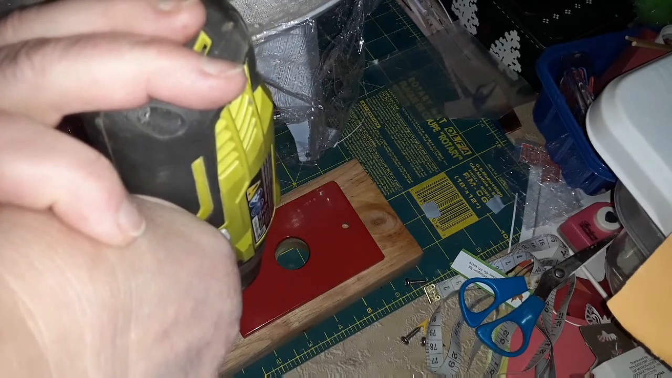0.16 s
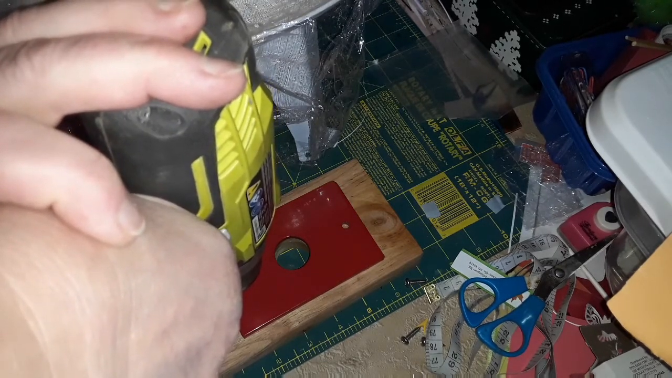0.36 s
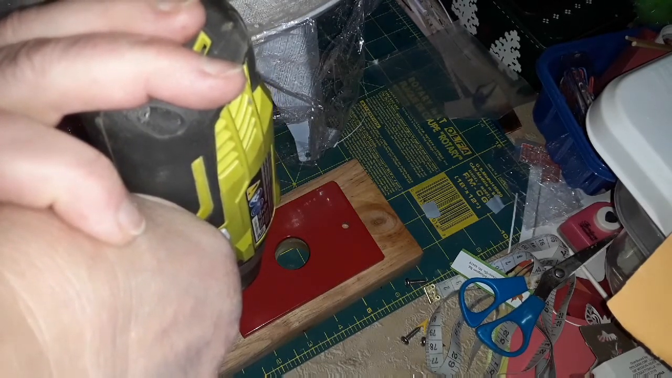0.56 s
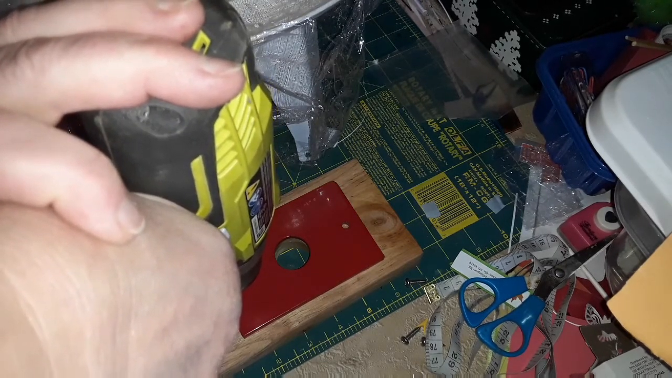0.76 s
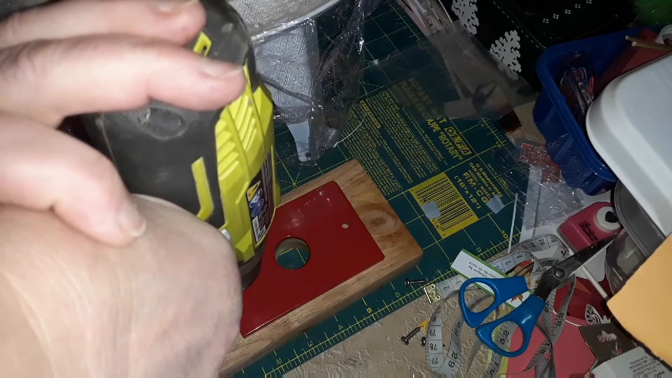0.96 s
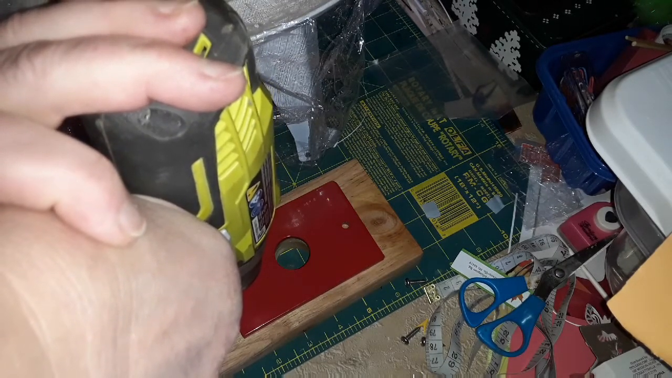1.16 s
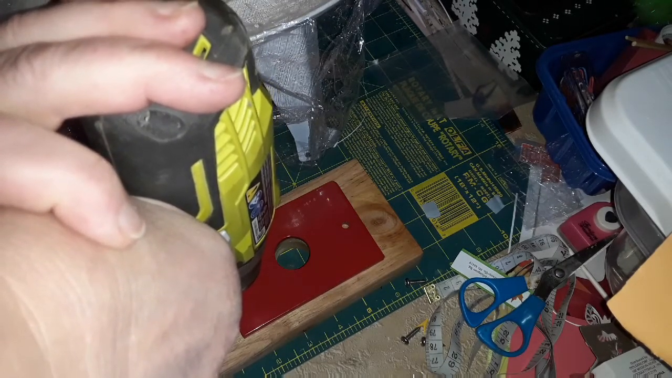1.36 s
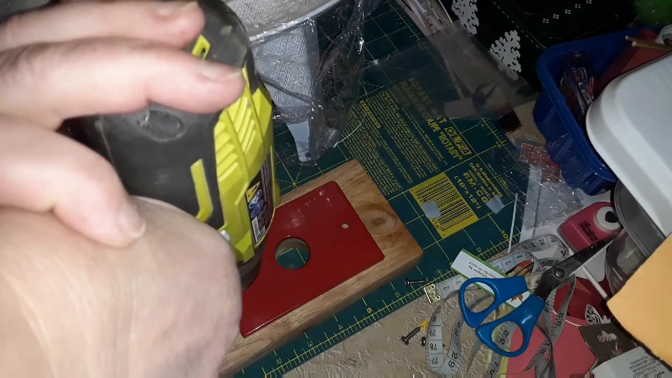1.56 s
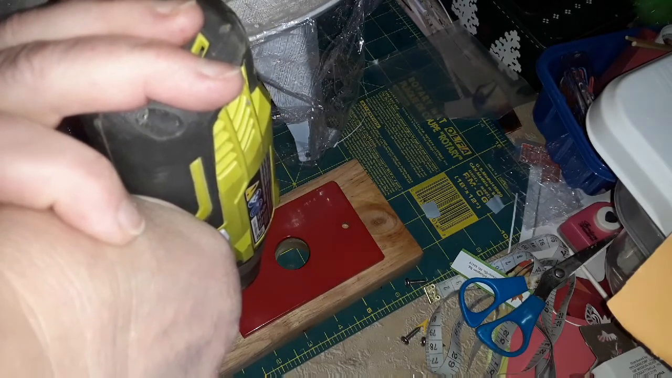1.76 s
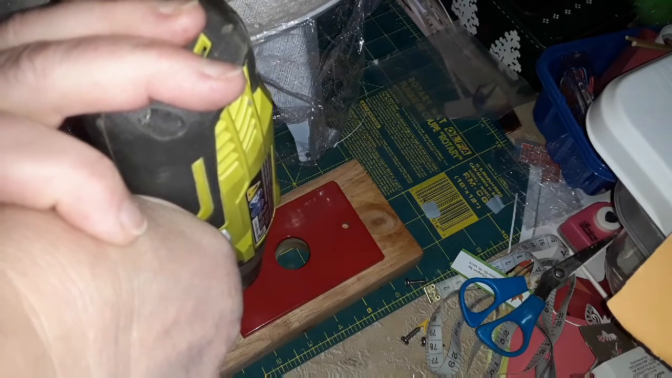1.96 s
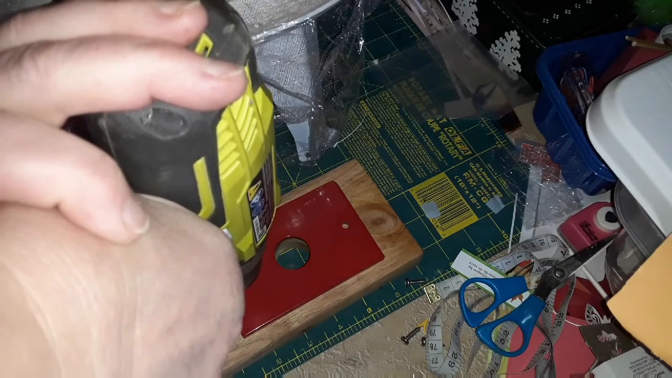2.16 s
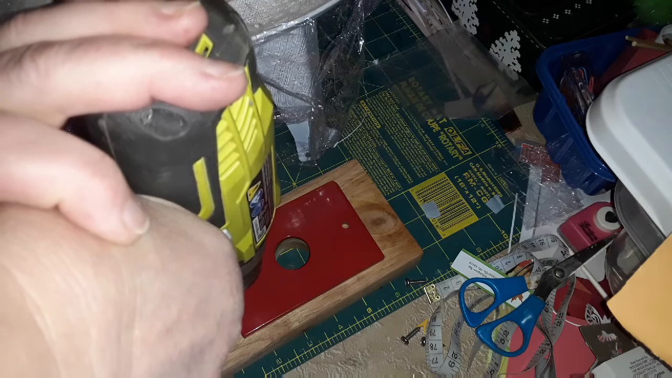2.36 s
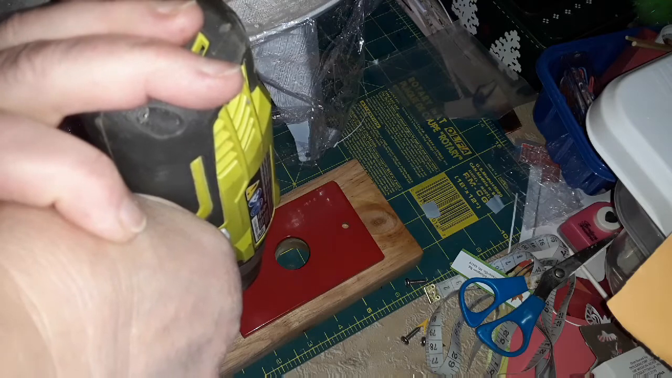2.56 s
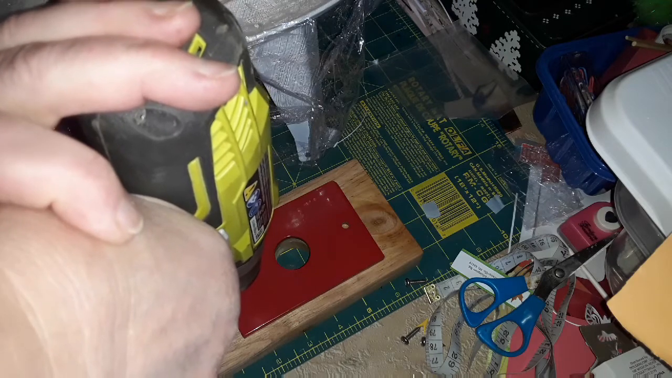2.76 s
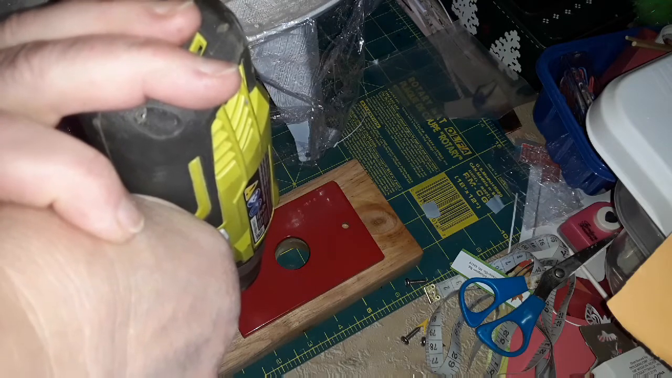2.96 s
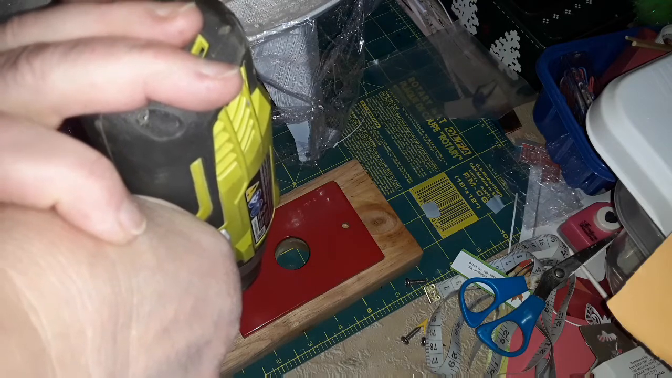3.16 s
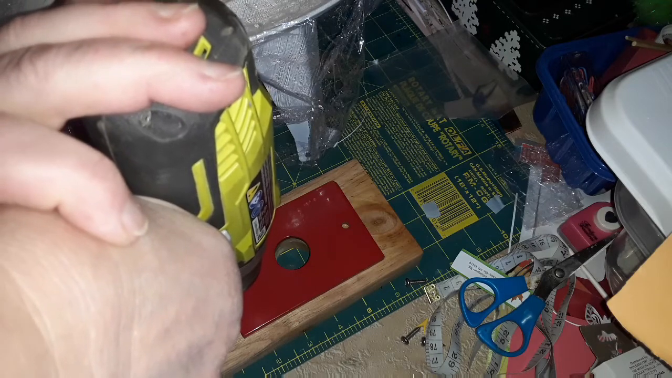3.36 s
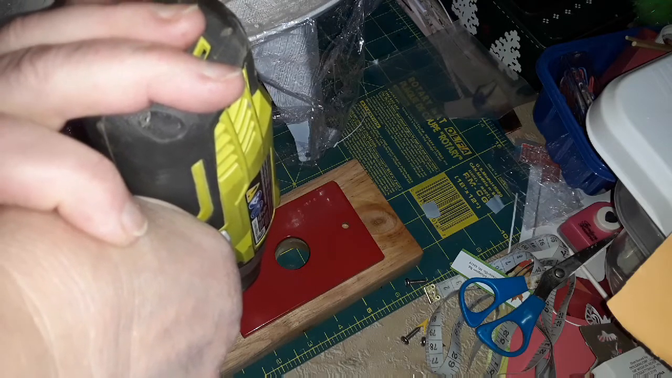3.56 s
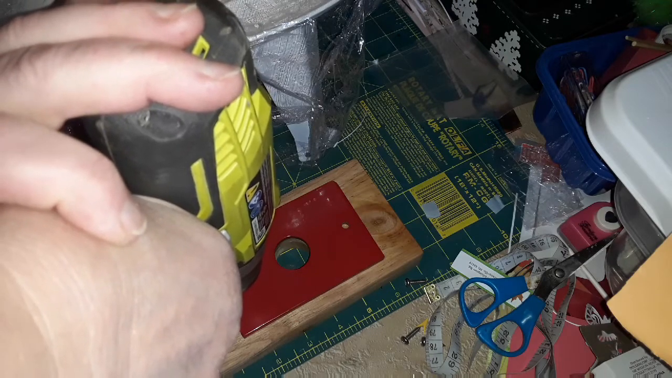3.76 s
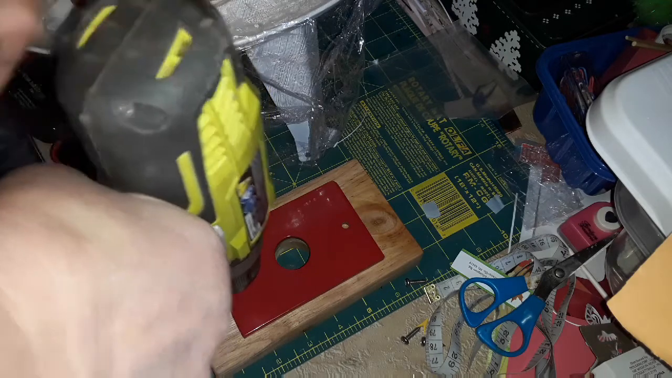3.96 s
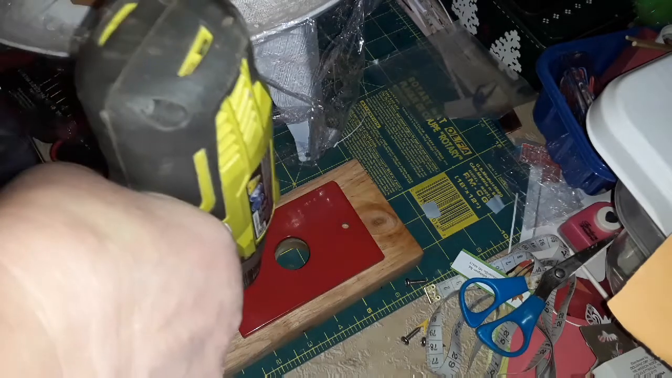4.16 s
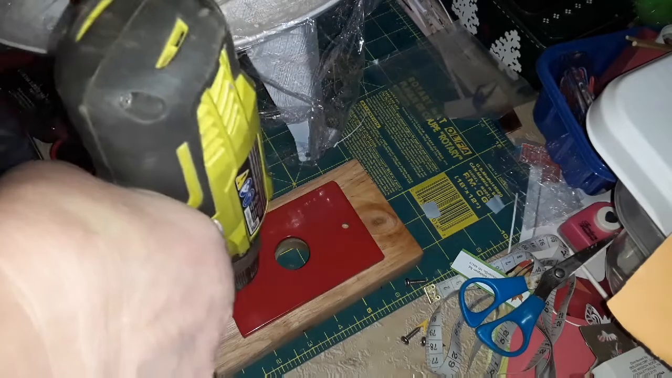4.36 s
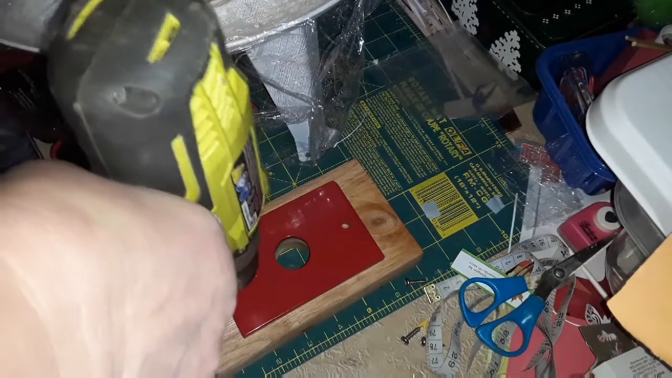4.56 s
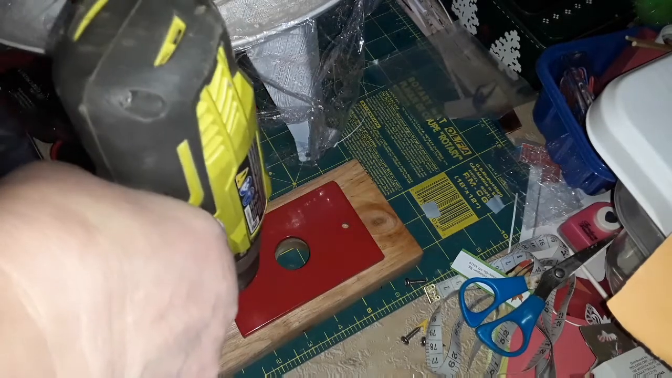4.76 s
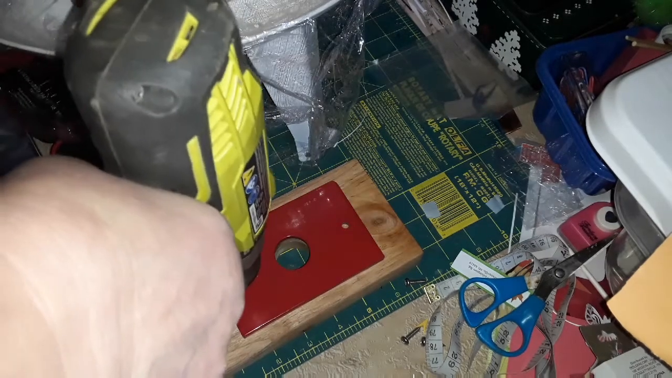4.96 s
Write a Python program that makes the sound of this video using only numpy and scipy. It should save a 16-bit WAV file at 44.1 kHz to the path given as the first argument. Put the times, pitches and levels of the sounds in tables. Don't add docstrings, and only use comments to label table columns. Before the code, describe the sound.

In a small workshop, a drill already running grinds through wood, its tone sagging slightly and recovering. Near the middle it frees up and whirs higher, then brakes sharply with a click. Half a second of near silence follows over a quiet fan, with light switch clicks, then the motor surges back to full speed and runs to the end. Close stereo pickup, little reverberation.

```python
import sys
import numpy as np
from scipy import signal
from scipy.fft import rfft, irfft, next_fast_len
from scipy.io import wavfile
from scipy.ndimage import uniform_filter1d, map_coordinates

SR = 44100
rng = np.random.default_rng(int(sys.argv[2]) if len(sys.argv) > 2 else 0)


def to_wav(s):
    ch = np.atleast_2d(s).T
    pcm = np.round(np.clip(ch, -1, 1) * 32767)
    wavfile.write(sys.argv[1], SR, pcm.astype(np.int16))


def elevation(decibels):
    levels = np.asarray(decibels, float)
    return 10 ** (levels / 20)


N = 220816
T = np.arange(N) / SR
LAG_S = 9 / SR
THROUGH_S, RESTART_S = 2.77, 4.37

GEAR_HZ = [142.3, 145.5, 175]


def unit(x):
    return x / np.sqrt(np.mean(x ** 2) + 1e-20)


def along(points, hz, size=1):
    p = np.array(points)
    return np.interp(np.log(hz + 1), np.log(p[:, 0] + 1), p[:, size])


def curves(rows):
    s, *cols = np.transpose(rows)
    return [np.interp(T, s, c) for c in cols]


def wobble(rate):
    return map_coordinates(rng.standard_normal(int(N * rate / SR) + 4), [T * rate])


def filtered(x, response):
    m = next_fast_len(N + SR // 2)
    return irfft(rfft(x, m) * response(np.fft.rfftfreq(m, 1 / SR)), m)[..., :N]


def spread(pair, alike):
    turn = lambda hz: np.arccos(np.clip(along(alike, hz), -1, 1)) / 2
    mid, side = filtered(pair, lambda hz: np.array([np.cos(turn(hz)), np.sin(turn(hz))]))
    return np.array([mid + side, mid - side])


def surging(speed):
    return uniform_filter1d(np.abs(np.gradient(speed)) * SR, SR // 20)


def drill():
    # mode_hz, loaded_db, free_db
    board = [(25, -18, -19), (60, -21.5, -20.5), (119, -18, -17), (240, -13, -14.5), (445, -13.5, -11.5),
             (890, -9.5, -9), (1328, -7, -6.5), (1445, 0.5, 0.5), (2070, -3.5, 1), (2230, -4.5, -7.5)]
    # mode_hz, loaded_db, free_db
    case = [(2450, -4, -2), (2650, -4, -4), (2820, -3, -1), (2950, -5, -4), (3150, -2.5, -3.5),
            (3300, -4, -5), (3600, -2.5, -2), (3900, -3, -2), (4200, -4.5, -1), (4450, -14, -8),
            (4650, -11, -7), (4850, -5, -3), (5160, -3.5, -3), (5850, -7, -7), (6250, 0, 1),
            (6650, -4.5, -3), (6870, -5, -4), (7100, -1, -1), (7350, -4.5, -2.5), (7600, -3.5, -1),
            (7850, -9, -8.5), (8400, -6, -4), (8900, -9, -6.5), (9300, -5, -2.5), (9600, -5, -1.5),
            (9800, -9, -5), (10300, -11.5, -8.5), (10650, -10.5, -7), (11000, -12, -10), (11500, -11, -8.5),
            (12500, -15, -14.5), (12900, -13.5, -10.5), (13360, -13.5, -11)]
    # freq_hz, coherence (0-1)
    alike = [(30, 0.056), (130, 0.31), (300, 0.63), (700, 0.75), (1000, 0.55), (1600, 0.6), (1950, .6),
             (2150, 0.75), (2450, 0.55), (2750, 0.6), (3100, 0.35), (4000, .35), (5000, 0.2), (6200, .35),
             (7000, .5), (7800, .25), (9100, .5), (10500, 0.2)]
    speed = rotor()
    turns = np.cumsum(speed) / SR
    noise_db, board_db = effort(speed)

    knots = rng.standard_normal(160)
    ripple = lambda hz: elevation(2.2 * (hz > 1800) * map_coordinates(knots, [hz / 140]))
    source = filtered(spread(rasp(turns), alike), ripple)
    modes = list(board) + list(case)
    loaded = filtered(source, lambda hz: elevation(along(modes, hz, size=1)))
    free = filtered(source, lambda hz: elevation(along(modes, hz, size=2)))
    free_share = np.clip((speed - 146) / 25, 0, 1)
    body = (1 - free_share) * unit(loaded) + free_share * unit(free)

    low = filtered(body, lambda hz: 1 / (1 + (hz / 1000) ** 4))
    body = body - low + elevation(np.clip(board_db, -4, 14)) * low
    high = filtered(body, lambda hz: 1 / (1 + (4800 / (hz + 1)) ** 6))
    dull_db = (T > RESTART_S) * (0.5 - 5.5 * np.clip((178 - speed) / 55, 0, 1))
    body = body - high + elevation(dull_db) * high

    typical_db = np.interp(speed, GEAR_HZ, [-27.5, -26.5, -24])
    return elevation(noise_db + 3.0) * body, elevation(noise_db - typical_db) * whine(speed, turns)


def rotor():
    # time_s, speed_hz
    boring_path = [
        (0, 143),
        (.7, 142.25),
        (1.15, 142.2),
        (1.45, 143.7),
        (1.95, 145.42),
        (2.5, 145.5),
        (2.77, 146.2),
    ]
    free_hz, spin_up_s = 177.2, .21
    brake_s, brake_hz_per_s, creep_hz = 3.78, 900, 60
    start_hz, full_hz = 93, 186
    slack_hz, slack_s = 35, .05
    boring, = curves(boring_path)
    ease = lambda s: 1 - np.exp(-np.clip(T - s, 0, None) / spin_up_s)
    first = boring + (free_hz - boring) * ease(THROUGH_S)
    first -= brake_hz_per_s * np.clip(T - brake_s, 0, None)
    second = start_hz + (full_hz - start_hz) * ease(RESTART_S)
    second -= slack_hz * np.exp(-np.abs(T - RESTART_S) / slack_s)
    return np.where(T < RESTART_S, np.maximum(first, creep_hz), second)


def effort(speed):
    cut_s, cut_db_per_s = 3.822, 694
    running_s, rise_db_per_s = 4.416, 490
    fall_db = cut_db_per_s * np.clip(T - cut_s, 0, None)
    off_db = np.minimum(fall_db, rise_db_per_s * np.clip(running_s - T, 0, None))
    floor_hz = np.where(T < RESTART_S, 150, 112)
    held = np.where(T > THROUGH_S, np.maximum(speed, floor_hz), speed)
    noise_db = -27 + 0.1151 * (held - GEAR_HZ[1]) - off_db
    noise_db -= 1.5 * np.clip(1 - T / 0.89, 0, 1)
    easing_db = -1 * np.clip(T - 3.47, 0, None)
    lifted_db = -2 + 2 * np.exp(-np.abs(T - running_s) / 0.084)
    noise_db += np.where(T < RESTART_S, easing_db, lifted_db)
    rumble_db = 2 + 0.0044 * np.minimum(surging(speed), 200) + off_db * (T < RESTART_S)
    return noise_db, rumble_db


def whine(speed, turns):
    # shaft_order, then level_db (rms) at each of GEAR_HZ
    lines = [(1, -71, -69, -56), (5, -48.5, -47, -46), (12, -38.5, -38.5, -35.5), (15, -51, -43, -32),
             (16, -61, -59, -44), (17, -52, -48, -52), (22.5, -46, -56, -60), (26, -50, -51, -60),
             (27, -51, -51, -60), (28, -50, -47, -60), (29, -47, -58, -60), (31, -60, -53, -60),
             (34, -58, -50, -58), (20 / 3, -64, -55, -62), (25 / 3, -62, -54, -60), (43.6, -58, -46, -60),
             (48.6, -58, -48, -60), (52, -60, -51, -60), (58, -51, -58, -60), (59, -48, -51, -60),
             (63, -60, -50, -60), (64, -54, -49, -60), (67, -50, -58, -60), (68, -60, -53, -60),
             (71, -60, -54, -62), (32, -51, -60, -60), (20, -37.5, -35, -46), (24, -60, -60, -47),
             (25, -43, -43, -39.5), (30, -44, -44, -51), (35, -38, -38, -46), (36, -53, -51, -41),
             (38, -53, -59, -39), (39, -61, -53, -44.5), (40, -57, -52, -41), (41, -59, -56, -42.5),
             (45, -34.5, -47, -52), (49, -60, -44, -50), (50, -45, -42, -42), (53, -50, -55, -46.5),
             (55, -48, -50, -45), (60, -43, -47, -53), (65, -42, -46, -50), (66, -58, -51, -60),
             (73, -58, -52, -60), (70, -50, -53, -59.5), (75, -51, -53, -62)]
    beam_points = [(5, 0, 0), (12, -.4, -.3), (15, 0, 0), (20, .6, -2.3), (25, -.5, -4.4), (30, -3.4, -4),
                   (35, -4.9, -6.7), (40, -9.4, -9), (45, -7.1, -7), (50, -8.4, -9.3), (60, -8.9, -9.6)]
    lifted_hz = [133, 149, 166, 180]
    lifted_lines = {5: (-54, -49, -44, -45), 12: (-42, -35, -36, -33), 15: (-58, -47, -34, -29),
                    17: (-55, -48, -42, -37), 20: (-41, -30, -44, -42), 25: (-46, -45, -42, -39),
                    30: (-43, -46, -52, -52), 35: (-52, -52, -46, -37), 38: (-58, -58, -46, -43),
                    40: (-52, -43, -43, -36), 45: (-46, -42, -41, -49), 50: (-53, -48, -52, -36),
                    55: (-56, -54, -48, -41), 65: (-60, -58, -52, -46)}
    lifted_lead = {5: .8, 12: 2.7, 15: 1.9, 17: -2.2, 20: -1.9, 25: -1.1, 30: -.9, 35: -2.4, 38: -.3, 40:
                   .8, 45: 0, 50: 2.8, 55: 0, 65: 0}
    crossing = {15: 3, 17: 5, 20: -1, 22.5: 12, 25: 7, 30: 3, 38: -5, 40: 11, 41: -5, 45: 11, 55: 3, 60: 5}
    out = np.zeros((2, N))
    surge = surging(speed)
    leaning = -.075 * (T > 4.2)
    beam_order, *beam_rad = np.transpose(beam_points)
    first_run = T < RESTART_S
    ears = np.array([[.5], [-.5]])
    for order, *db in lines:
        line_db = np.interp(speed, GEAR_HZ, db) - np.minimum(.0016 * order * surge, 6)
        line_db += crossing.get(order, 0) * np.exp(-((speed - 162) / 8) ** 2)
        lifted_db = line_db - 4
        if order in lifted_lines:
            lifted_db = np.interp(speed, lifted_hz, lifted_lines[order])
        lifted_db = lifted_db - .35 * np.clip(lifted_hz[0] - speed, 0, None)
        flutter_db = np.where(T < THROUGH_S, 2.2, 1.5) * wobble(28)
        level = elevation(np.where(first_run, line_db, lifted_db) + flutter_db)
        drift = .25 * wobble(20)
        turned = np.interp(speed, [147, 170], [np.interp(order, beam_order, rad) for rad in beam_rad])
        lead = 2 * np.pi * order * speed * LAG_S + turned + leaning * order
        if order in lifted_lines:
            lead = np.where(first_run, lead, lifted_lead[order])
        lead = lead + .3 * wobble(4)
        phase = 2 * np.pi * order * turns + drift + rng.uniform(0, 7.72)
        out += np.sqrt(2) * level * np.sin(phase + lead * ears)
    return out


def rasp(turns):
    fresh = rng.standard_normal((2, N))
    z = signal.stft(fresh, nperseg=2048, noverlap=1536)[2]
    field = uniform_filter1d(rng.standard_normal(z.shape[1:]), 9, axis=1)
    depth_db = np.clip(np.arange(1025) / 14, .5, 4.6)[:, None]
    fresh = signal.istft(z * elevation(depth_db * unit(field)), nperseg=2048, noverlap=1536)[1][:, :N]

    orders = np.arange(129)
    between = (orders > 16) & (orders % 5 > 0) & (orders < 92)
    wear_level = between * elevation(rng.normal(0, 3.5, (2, 129)))
    wear = irfft(wear_level * np.exp(2j * np.pi * rng.random((2, 129))), 256)
    angle = turns % 1 * 256
    repeat = np.array([np.interp(angle, np.arange(256), w, period=256) for w in wear])

    beat = 1 + 0.017 * np.cos(2 * np.pi * turns) + 0.2 * np.cos(2 * np.pi * 5 * turns)
    chips = elevation(0.36 * wobble(300) + 0.51 * wobble(30.14))
    return (unit(fresh) + elevation(-13.5) * unit(repeat)) * beat * chips


def trigger():
    # start_s, peak_db, t60_s, dullness (0-1)
    impacts = [
        (3.8116, -15.5, 0.056, 0.54),
        (4.2848, -46, .01, .3),
        (4.2864, -29, 0.013, 0.15),
        (4.2922, -32, 0.016, 0.6),
        (4.298, -44, 0.017, 0.7),
        (4.3187, -37, 0.022, 0.9),
        (4.326, -43, 0.03, 0.5),
        (4.3335, -46, 0.023, 0.6),
        (4.358, -32, 0.015, 0.25),
        (4.367, -43, 0.02, 0.3),
    ]
    # mode_hz, width_hz, level_db
    shell_modes = [(2800, 260, 13), (4680, 550, 8.5), (6400, 840, 4), (9400, 1500, 4), (11400, 1200, -3)]
    # time_s, level_db
    chopper = [
        (4.361, -75),
        (4.364, -54),
        (4.39, -52),
        (4.405, -66),
    ]
    bright, dull = np.zeros((2, N + SR)), np.zeros((2, N + SR))
    t = np.arange(SR // 8) / SR
    for s, db, t60, dullness in impacts:
        envelope = elevation(db - 60 * t / np.clip(t60, .01, .05)) * (1 - np.exp(-t / 0.0012))
        burst = envelope * rng.standard_normal((2, len(t)))
        first = round(s * SR)
        bright[:, first:][:, :len(t)] += (1 - dullness) * burst
        dull[:, first:][:, :len(t)] += dullness * burst
    bright, dull = bright[:, :N], dull[:, :N]

    mode = lambda f, center, width: 1j * f * width / (center ** 2 - f * f + 1j * f * width)
    shell = lambda f: sum((-1) ** k * elevation(db) * mode(f, c, w) for k, (c, w, db) in enumerate(shell_modes))
    clicks = filtered(bright, shell) + filtered(dull, lambda f: elevation(8) * mode(f, 2500, 2500))
    clicks += filtered(dull, lambda f: elevation(2.5) * mode(f, 133, 80))

    db, = curves([(0, -130), (4.35, -130)] + list(chopper) + [(4.45, -130)])
    whistle = elevation(db) * (np.sin(2 * np.pi * 6390 * T) + elevation(2) * np.sin(2 * np.pi * 12800 * T))
    return elevation(4.0) * spread(clicks, [(1000, 0.36)]) + whistle


def squeak():
    glide = list([
        (3.86, 2650, -80),
        (3.89, 2750, -56),
        (3.935, 3380, -59),
        (3.945, 3450, -95),
        (3.95, 2700, -95),
        (3.96, 2800, -68),
        (3.99, 3300, -69),
        (4.01, 3450, -95),
    ])
    hz, db = curves([(0, glide[0][1], -130)] + glide + [(4.1, glide[-1][1], -130)])
    cycles = np.cumsum(hz) / SR
    tone = np.sin(2 * np.pi * cycles) + elevation(-20) * np.sin(3.1 * np.pi * cycles)
    return elevation(db + 2 * wobble(60)) * tone


def walls(x):
    # freq_hz, t60_s
    decay = [(200, 0.2), (2000, 0.23), (10000, 0.14)]
    hz, t, z = signal.stft(rng.standard_normal((2, SR // 2)), SR, nperseg=256)
    t60 = along(decay, hz)[:, None]
    late = elevation(-15 - 60 * t / (2.6 * t60))
    tail = signal.istft(z * (elevation(-60 * t / t60) + late), SR, nperseg=256)[1]
    delayed = np.pad(x, ((0, 0), (300, 0)))
    return signal.fftconvolve(delayed, tail / np.linalg.norm(tail[0]), axes=1)[:, :N]


def workshop():
    # pitch_hz, level_db (rms)
    hum_lines = [(120, -82.5), (247.6, -69), (359.7, -71), (479.6, -63.5), (561, -72.5), (597.5, -71.5),
                 (1012, -82.5), (1130, -75), (1249, -82), (1373, -82), (1857, -83)]
    # freq_hz, density_db (per Hz)
    hiss_spectrum = [(15, -55), (25, -23.5), (156, -18), (243, -10), (397, -9), (475, -5), (527, -14),
                     (584, -6), (700, -17.5), (954, -27), (1140, -10.5), (1520, -19.5), (4610, -29),
                     (6620, -22), (9000, -30), (12000, -35.5), (13100, -39), (22000, -120)]
    noise = spread(rng.standard_normal((2, N)), [(100, 0.61), (2000, .1)])
    hiss = filtered(noise, lambda hz: elevation(along(hiss_spectrum, hz)))
    hum = np.zeros(N)
    for hz, db in hum_lines:
        hum += elevation(db + 1 + 2.5 * wobble(30)) * np.sin(2 * np.pi * hz * T + .5 * wobble(15))
    return elevation(-67 + 5.0) * unit(hiss) + hum


def scene():
    # freq_hz, left_minus_right_db
    tilt = [(60, 2), (110, -2), (200, 0), (360, -2.5), (660, -0.5), (1200, -2.5), (2190, 1), (3990, 1),
            (7260, -1.5), (13200, 0.5)]
    # freq_hz, phase_rad
    shadow = [(1000, 0), (2100, .3), (2600, -.2), (3700, -.9), (4200, -1.6), (5900, -1.5), (7000, -2.5),
              (8400, -2.2), (10500, -3.2)]
    noise, tones = drill()
    tool = noise + trigger() + squeak()
    gain = lambda hz: elevation(along(tilt, hz) * [[.5], [-.5]])
    phase = lambda hz: (np.pi * hz * LAG_S + along(shadow, hz) / 2) * np.array([[1], [-1]])
    direct = filtered(tool, lambda hz: gain(hz) * np.exp(1j * phase(hz)))
    return direct + tones + elevation(-16) * walls(tool + tones) + workshop()


def band_limit(x):
    return signal.sosfilt(signal.butter(12, 13820, fs=SR, output="sos"), x)


def record(dry):
    edge = lambda hz: np.cos(np.pi / 2 * np.clip((hz - 13210) / 160 + .5, 0, 1)) ** 2
    return band_limit(filtered(dry, edge))


dry = scene()
out = record(dry)
to_wav(out)
```